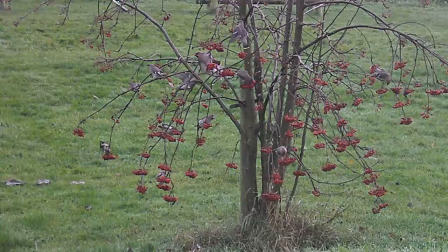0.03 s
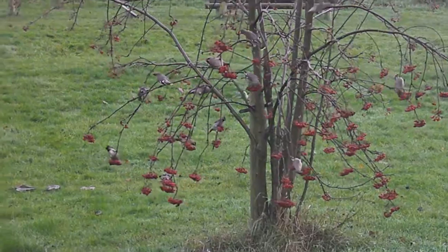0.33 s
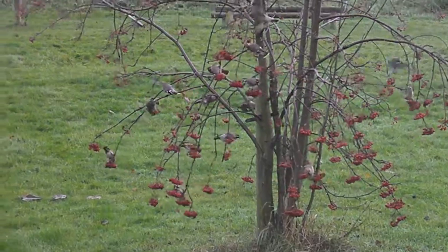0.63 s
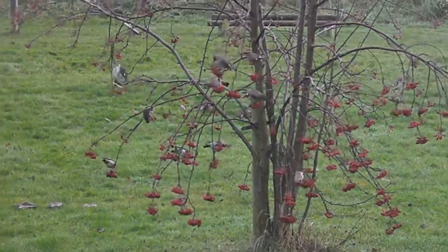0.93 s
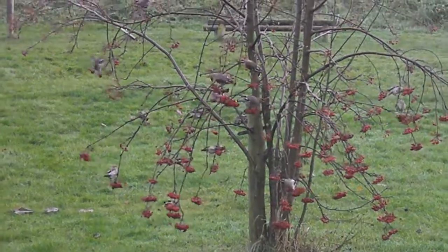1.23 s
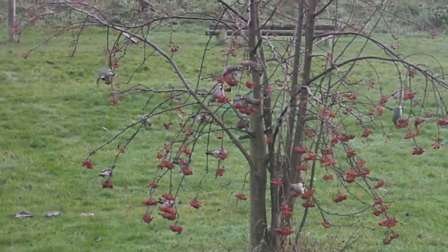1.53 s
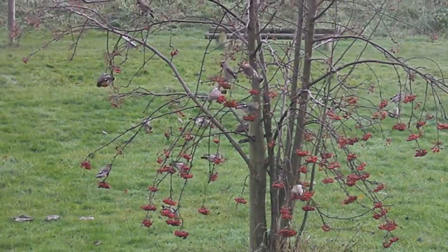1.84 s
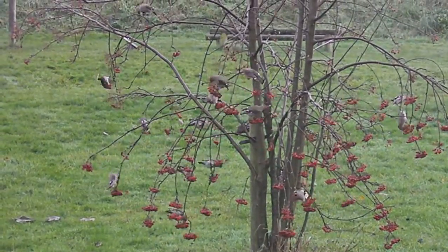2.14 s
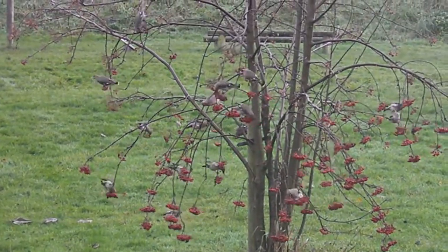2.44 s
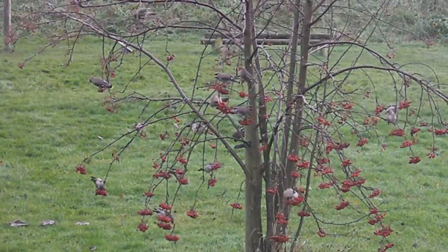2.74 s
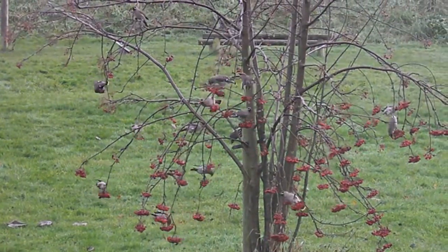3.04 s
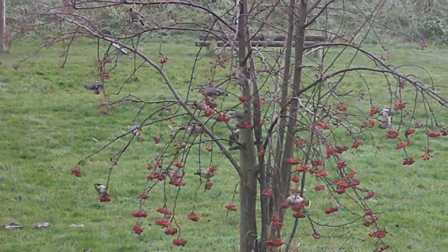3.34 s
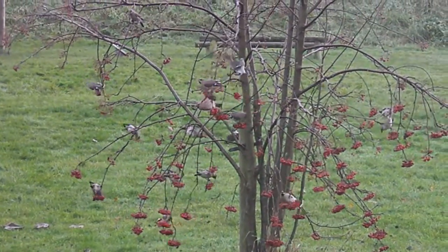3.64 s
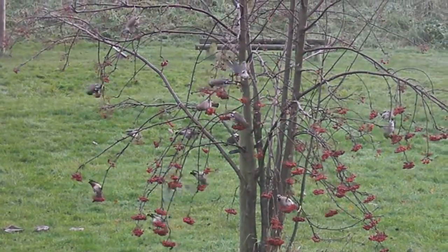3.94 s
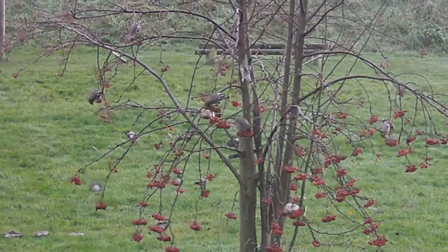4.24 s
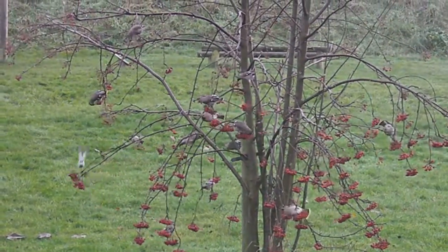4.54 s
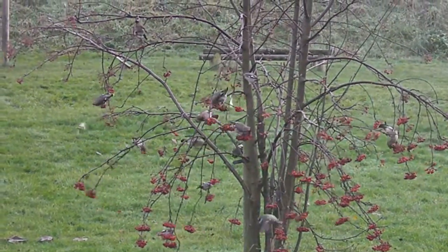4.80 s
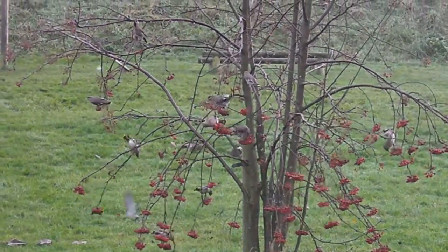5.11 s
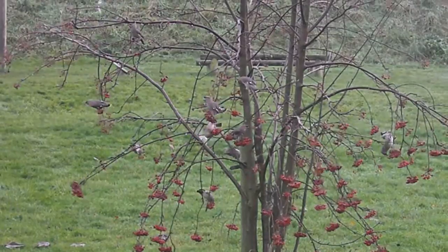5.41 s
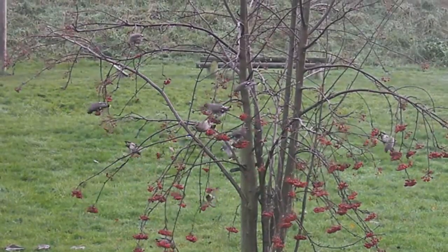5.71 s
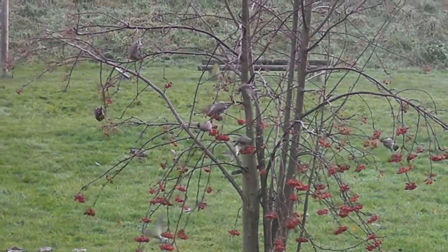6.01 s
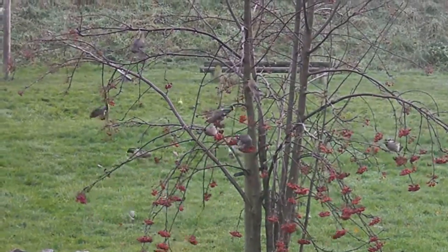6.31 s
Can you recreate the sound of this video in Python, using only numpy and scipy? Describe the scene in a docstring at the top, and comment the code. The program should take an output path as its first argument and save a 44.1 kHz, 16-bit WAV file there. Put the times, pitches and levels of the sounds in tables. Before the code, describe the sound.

Distant traffic rushes steadily through a garden for about six and a half seconds, with a soft hiss of leaves. Almost at once, a flock of small birds starts giving high, silvery trills and short downward whistles that overlap throughout. The clearest trills come around 0.4, 2.5, 3.9 and 4.8 seconds. Farther birds add thin held whistles from about 0.7 to 1.7 seconds, then short hoarse calls around 2, 3 and 5.2 seconds. Faint dry twig ticks fall near 0.7, 1.1, 1.5, 3.3 and 4.9 seconds, and wings swish softly around 1 second and again near 5. From about 5.9 seconds to the end, one bird close to the microphone gives quick, sharp chirps sweeping up and down, the loudest sound here, while the flock keeps trilling. The sound is mono, with light reflections from the ground and hedges.

```python
"""A garden with a berry tree, where a flock of waxwings feeds: silvery trills and slurred calls overlap,
twigs tick under beaks and feet, wings swish. Other small birds call from farther off; one chirps loudly
close by at the end. Calls are unsteady syrinx tones; twigs and wings are bursts of coloured noise.
Ground, branches and hedges reflect them. Distant traffic rushes behind. One mono microphone."""
import sys
import numpy as np
from scipy import signal
from scipy.fft import rfft, irfft, next_fast_len
from scipy.io import wavfile
from scipy.ndimage import map_coordinates

SR = 44100
rng = np.random.default_rng(int(sys.argv[2]) if len(sys.argv) > 2 else 0)


def master_out(mix):
    """Clip the mix to full scale and print it as 16-bit PCM to the path in sys.argv[1]."""
    frames = np.transpose(np.atleast_2d(mix))
    ceiling = np.clip(frames, -1, 1)
    pcm = np.round(ceiling * 32767).astype(np.int16)
    wavfile.write(sys.argv[1], SR, pcm)


N = 284886


def amp(db):
    """Decibels to gain."""
    return 10 ** (np.asarray(db) / 20)


def unit(x):
    """Scale to rms 1."""
    return x / np.sqrt(np.mean(x ** 2) + 1e-20)


def along(points, hz):
    """Read (frequency [Hz], value) points on a log axis."""
    knots_hz, values = np.transpose(points)
    return np.interp(np.log(hz + 1), np.log(knots_hz), values)


def wobble(rate_hz, size):
    """Smooth random curve, rate_hz knots a second."""
    knots = rng.standard_normal(int(size * rate_hz / SR) + 4)
    return map_coordinates(knots, [np.arange(size) * rate_hz / SR])


def filtered(x, response):
    """Apply a frequency response to x."""
    size = next_fast_len(N + SR // 2)
    return irfft(rfft(x, size) * response(np.fft.rfftfreq(size, 1 / SR)), size)[:N]


def noise(spectrum):
    """Coloured noise, rms 1."""
    return unit(filtered(rng.standard_normal(N), lambda hz: amp(along(spectrum, hz))))


def add(track, start_s, sound):
    """Mix a sound into the track."""
    part = track[max(0, round(start_s * SR)):][:len(sound)]
    part += sound[:len(part)]


def syrinx(hz, jitter, flutter_db):
    """Bird tone, rms 1, unsteady in pitch and level."""
    phase = 2 * np.pi * np.cumsum(hz * (1 + jitter * wobble(495, len(hz)))) / SR
    return unit(np.sin(phase) * amp(flutter_db * wobble(132, len(hz))))


def call(start_s, length_s, start_hz, end_hz, db, arch, jitter, taper):
    """One note: a slightly arched glide with tapered ends."""
    track = np.zeros(N)
    u = np.linspace(0, 1, int(length_s * SR))
    hz = (start_hz + (end_hz - start_hz) * u) * (1 + arch * np.sin(np.pi * u))
    envelope = amp(db) * signal.windows.tukey(len(u), taper)
    add(track, start_s, envelope * syrinx(hz, jitter, flutter_db=3.0))
    return track


def traffic():
    """Tyre roar of a far road and a faint engine hum."""
    road_levels = [(0, -35.5), (3.2, -36), (3.8, -36.9), (5.6, -36.5), (6.46, -36)]  # (time [s], level [dB])
    tyre_spectrum = [(25, -39.5), (60, -31.5), (95, -28.5), (160, -20), (280, -11.5), (450, -8), (780, 0),
                     (1050, 0), (1500, -7.5), (2200, -17.5), (4000, -23.5), (9000, -43.5)]  # (frequency [Hz], density [dB])
    engine_partials = [(173, -66.5), (340, -59.5)]  # (frequency [Hz], level [dB])
    road_db = np.interp(np.arange(N) / SR, *np.transpose(road_levels)) + 0.37 * wobble(11, N)
    tyres = amp(road_db) * noise(tyre_spectrum)
    hum = np.zeros(N)
    for hz, db in engine_partials:
        gain = amp(db + 1.5 * wobble(2.89, N))
        phase = 2 * np.pi * np.cumsum(hz + 1.45 * wobble(6, N)) / SR
        hum += gain * unit(np.sin(phase))
    return tyres + hum


def leaves():
    """Leaves and high hiss, nearly steady."""
    spectrum = [(500, -18), (2500, -0.5), (3800, 1), (6000, -1), (7500, -4), (10000, -10), (15500, -13.5)]  # (frequency [Hz], density [dB])
    return amp(-48.5 + 0.7 * wobble(3.36, N)) * noise(spectrum)


def wings(beat_hz):
    """Feathers brush the twigs, one puff per wingbeat."""
    rustles = [(0.129, .17, -63), (.61, 0.073, -62), (.765, 0.085, -51), (0.926, 0.16, -49),
               (2.698, .04, -48), (3.92, .12, -54), (4.1, .13, -57), (4.84, 0.32, -52.5)]  # (time [s], length [s], level [dB])
    spectrum = [(1000, -24), (3000, -1), (5500, 1), (7500, 5), (10000, -16), (15000, -23.5)]  # (frequency [Hz], density [dB])
    envelope = np.zeros(N)
    for start_s, length_s, db in rustles:
        t = np.arange(int(length_s * SR)) / SR
        beat_db = 2.9 * np.cos(2 * np.pi * beat_hz * t)
        add(envelope, start_s, amp(db + beat_db) * signal.windows.tukey(len(t)))
    return envelope * amp(2.2 * wobble(300, N)) * noise(spectrum)


def trill_syllables(slowing_s=.00057, sag_hz_per_s=536, fade_db=20, scatter_db=1.5):
    """Waxwing trills swell, fade, slow and sag. Returns (time [s], pitch [Hz], level [dB])."""
    # (time [s], syllables [count], first period [s], pitch [Hz], peak [dB], peak position [fraction])
    phrases = [ (.137, 4, 0.06, 6670, -48.5, .4), (.175, 2, .06, 7440, -45.5, 0.54),
               (.364, 3, .048, 6420, -42, .75), (2.1, 7, .053, 6950, -50, .6),
               (2.468, 9, 0.057, 6480, -42.5, 0.55), (3.087, 3, .06, 6220, -50, .4),
               (3.866, 5, 0.06, 6470, -46.5, .35), (4.768, 4, 0.055, 7240, -52, 0.61),
               (4.802, 7, .0568, 6380, -43.5, 0.5), (5.549, 6, 0.052, 6240, -50, .4),
               (6.142, 6, .0488, 6790, -46, 0.84), (6.315, 3, 0.04, 8080, -46.5, 0.84)]
    rows = []
    for start_s, count, period_s, hz, db, peak_at in phrases:
        k = np.arange(round(count))
        t = k * period_s + slowing_s * k * (k - 1) / 2
        swell_db = -fade_db * ((k + .5) / len(k) - peak_at) ** 2
        level_db = db + swell_db + scatter_db * rng.standard_normal(len(k))
        rows += zip(start_s + t, hz - sag_hz_per_s * t, level_db)
    return np.array(rows)


def trills(syllables, length_s, jitter, variety):
    """Each syllable flicks up, sinks and drops away; length and slope vary at random."""
    shape = [(0, .88, -5), (.1, 0.98, -2.5), (.35, .945, -3.5), (.75, .9, -4), (.88, .865, -4.5),
             (1, 0.74, -14)]  # (position [fraction], pitch [ratio], gain [dB])
    position, pitch_ratio, shape_db = np.transpose(shape)
    variations = np.exp(variety * rng.standard_normal((len(syllables), 2)))
    track = np.zeros(N)
    for (start_s, hz, db), (stretch, slope) in zip(syllables, variations):
        u = np.linspace(0, 1, int(length_s * np.sqrt(stretch) * SR))
        contour = np.interp(u, position, pitch_ratio) ** slope
        envelope = amp(db + np.interp(u, position, shape_db))
        add(track, start_s, envelope * syrinx(hz * contour, jitter, flutter_db=2))
    return track


def flock(floor_db, spread_s, pitch_span, count):
    """Trilling is catching: birds deeper in the tree join in around the syllables, at about 6-7.5 kHz."""
    leaders = rng.choice(trill_syllables(), size=count)
    followers = []
    for (lead_s, lead_hz, _), (lag, pitch, loudness) in zip(leaders, rng.random((count, 3))):
        hz = min(lead_hz, 6400) * (.95 + pitch_span * pitch ** 2)
        followers.append((lead_s + spread_s * (2 * lag - 1), hz, floor_db + 4 * loudness))
    return trills(followers, length_s=.047, jitter=.01, variety=0.191)


def far_calls(gain_db, fall):
    """Far birds: thin whistles creep up, short calls fall; strong pitch jitter sounds hoarse."""
    # (time [s], length [s], start pitch [Hz], rise [fraction], relative level [dB])
    held_notes = [ (0.697, .32, 3870, 0.026, -58), (.89, 0.26, 8100, .005, -51),
                  (.97, .226, 8530, .055, -58), (1.15, .13, 7440, .005, -48.5), (1.26, .14, 8020, .05, -52),
                  (1.383, .2, 7950, .04, -46.5), (1.59, 0.16, 8220, .003, -57)]
    # (time [s], length [s], start pitch [Hz], jitter [fraction], relative level [dB])
    falling_notes = [ (.272, 0.023, 2650, .018, -43.5), (1.245, 0.042, 3510, 0.074, -44.5),
                     (1.827, 0.0205, 4200, 0.094, -43.5), (1.88, .14, 5150, 0.077, -52),
                     (1.95, 0.047, 3900, .08, -42), (1.988, .067, 3480, 0.089, -42),
                     (2.164, 0.079, 3800, 0.1, -46.5), (2.712, .02, 4260, .08, -42),
                     (3.078, 0.11, 4850, .08, -50.5), (3.134, 0.038, 3410, 0.051, -42.5),
                     (5.17, .09, 3950, .07, -52), (5.226, 0.044, 3370, 0.027, -45),
                     (5.652, 0.062, 3695, 0.019, -50)]
    held = sum(call(start_s, length_s, hz, hz * (1 + rise), db, arch=0.0079, jitter=0.018, taper=0.26)
               for start_s, length_s, hz, rise, db in held_notes)
    falling = sum(call(start_s, length_s, hz, hz * (1 - fall), db, arch=.005, jitter=jitter, taper=0.39)
                  for start_s, length_s, hz, jitter, db in falling_notes)
    return amp(gain_db) * (held + falling)


def slurs():
    """Clear notes in the tree, sliding down."""
    notes = [ (.36, 0.082, 7300, 0.037, -42.5), (0.508, 0.11, 7780, 0.14, -50),
             (0.742, .048, 8150, .03, -47), (0.783, 0.062, 7800, .085, -39), (0.963, .05, 7700, 0.12, -44),
             (1.005, 0.042, 7860, .1, -42.5), (1.11, 0.039, 3880, .145, -47),
             (1.582, 0.065, 7980, 0.42, -46.5), (1.659, 0.02, 4090, .04, -45),
             (1.688, .033, 5200, .095, -45.5), (2.642, 0.022, 4200, 0.097, -44),
             (2.752, .04, 4410, 0.034, -41.5), (2.842, 0.037, 5080, .09, -50),
             (3.305, .074, 7230, 0.014, -43.5), (3.373, .032, 7300, .073, -43),
             (3.493, 0.07, 7620, 0.091, -40), (3.648, 0.053, 7270, 0.069, -45.5),
             (4.25, .042, 7750, .115, -52), (4.355, 0.051, 7720, 0.14, -50.5),
             (4.451, .049, 7730, .135, -45.5), (4.565, 0.052, 7470, .11, -47),
             (5.425, .023, 5800, .19, -45.5)]  # (time [s], length [s], start pitch [Hz], fall [fraction], level [dB])
    return sum(call(start_s, length_s, hz, hz * (1 - fall), db, arch=0.0108, jitter=0.0049, taper=.13)
               for start_s, length_s, hz, fall, db in notes)


def twigs(t60_s, gain_db):
    """Beaks and feet snap at stalks: short dry cracks."""
    ticks = [(0.651, -30.5), (.6692, -39), (1.0742, -33), (1.5407, -32), (3.2623, -35), (4.899, -39)]  # (time [s], relative level [dB])
    spectrum = [(1000, -22.5), (3000, -3), (7000, 2), (10000, -1), (15000, -13)]  # (frequency [Hz], density [dB])
    envelope = np.zeros(N)
    t = np.arange(SR // 20) / SR
    for start_s, db in ticks:
        add(envelope, start_s, amp(db + gain_db - 60 * t / t60_s))
    return envelope * noise(spectrum)


def flicks(length_s, period_s, rise):
    """Tiny rising notes, single or in even runs."""
    runs = [ (2.739, 1, 3650, -39.5), (3.48, 1, 7500, -44.5), (3.688, 2, 6880, -45.5),
            (3.858, 4, 7050, -47), (3.96, 1, 6930, -45), (4.283, 4, 4850, -48), (5.858, 1, 3600, -41),
            (5.872, 1, 4750, -43)]  # (time [s], notes [count], start pitch [Hz], level [dB])
    return sum(call(start_s + k * period_s, length_s, hz, hz * (1 + rise), db,
                    arch=.005, jitter=0.0065, taper=0.18)
               for start_s, count, hz, db in runs for k in range(round(count)))


def chirps():
    """The nearest bird: loud, quick sweeps up and down."""
    sweeps = [ (5.897, 0.027, 3800, 4400, -41), (5.926, 0.012, 3980, 4700, -29.5),
              (5.936, 0.023, 4210, 3080, -24.5), (6.053, 0.037, 3270, 3330, -35.5),
              (6.093, 0.029, 3575, 3810, -30.5), (6.119, 0.019, 3500, 4990, -25.5),
              (6.162, 0.014, 3630, 2960, -24), (6.237, 0.0244, 3620, 4580, -23),
              (6.284, .0193, 3540, 2800, -24.5), (6.363, 0.025, 3380, 2840, -23.5),
              (6.439, 0.02, 4220, 4420, -32)]  # (time [s], length [s], start pitch [Hz], end pitch [Hz], level [dB])
    return sum(call(*sweep, arch=0.0097, jitter=0.016, taper=0.32) for sweep in sweeps)


def garden(direct, ground_s, ground_db, tail_db):
    """Direct sound plus a ground bounce, dense scatter from branches and a tail from the hedges."""
    decay_times = [(2000, 0.77), (5000, 0.6), (9000, 0.74)]  # (frequency [Hz], T60 [s])
    hz, t, spectra = signal.stft(rng.standard_normal(SR // 2), SR, nperseg=256)
    branches = 1 + 1.8 * np.exp(-t / 0.012)
    decay = amp(-60 * t / along(decay_times, hz)[:, None])
    _, tail = signal.istft(spectra * branches * decay, SR, nperseg=256)
    impulse_response = amp(tail_db) * tail / np.linalg.norm(tail)
    impulse_response[0] += amp(ground_db)
    reflected = signal.fftconvolve(direct, impulse_response)[:N]
    delayed = filtered(reflected, lambda f: np.exp(-2j * np.pi * f * ground_s))
    return direct + delayed


def scene():
    """Birds at three distances over traffic and leaves; both channels alike."""
    tree = trills(trill_syllables(), length_s=.049, jitter=0.0058, variety=0.123)
    tree += slurs() + flicks(length_s=.0105, period_s=.0705, rise=0.126)
    tree += twigs(t60_s=.016, gain_db=-6) + wings(beat_hz=15.0)
    distant = far_calls(gain_db=-2.5, fall=.12)
    distant += flock(floor_db=-59.0, spread_s=0.083, pitch_span=0.24, count=80)
    mono = traffic() + leaves()
    mono += garden(tree, ground_s=.004, ground_db=-14, tail_db=-11)
    mono += garden(distant, ground_s=.003, ground_db=-12.5, tail_db=3.0)
    mono += garden(chirps(), ground_s=.0068, ground_db=-6.5, tail_db=-7.5)
    return np.array([mono, mono])


def record(dry):
    """Camera microphone: a moment of silence first, a narrow treble notch, a band limit."""
    start_s, notch_hz, width_hz, top_hz = .136, 7880, 110, 15800

    def response(hz):
        notch = 1 - .9 * np.exp(-((hz - notch_hz) / width_hz) ** 2)
        return notch * (hz < top_hz)

    running = np.arange(N) / SR >= start_s
    return np.array([filtered(channel * running, response) for channel in dry])


dry = scene()
out = record(dry)
master_out(out)
```